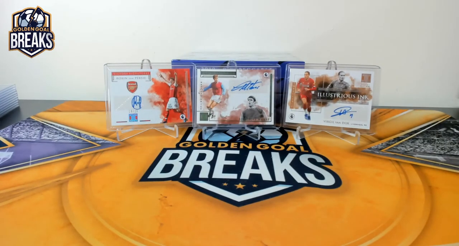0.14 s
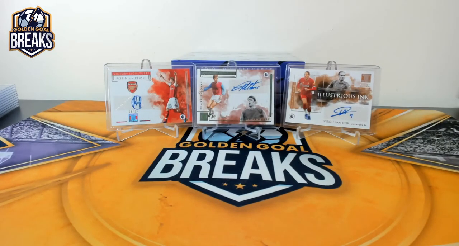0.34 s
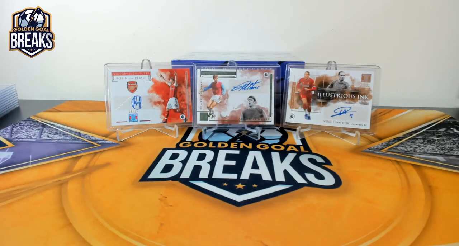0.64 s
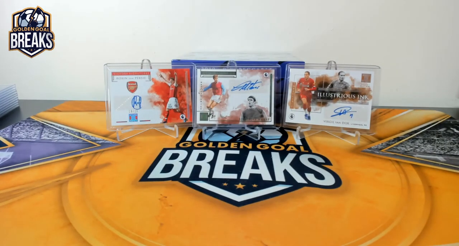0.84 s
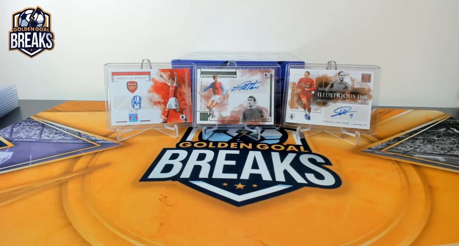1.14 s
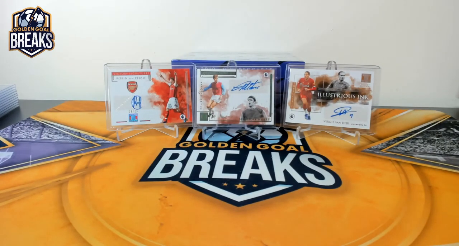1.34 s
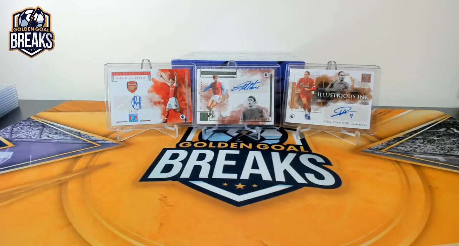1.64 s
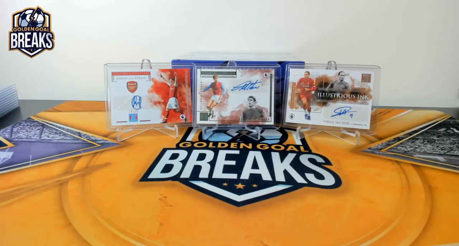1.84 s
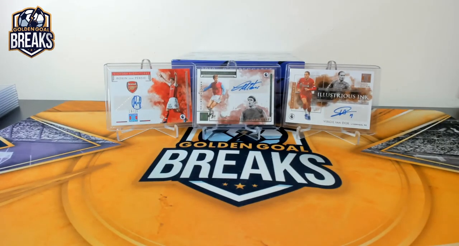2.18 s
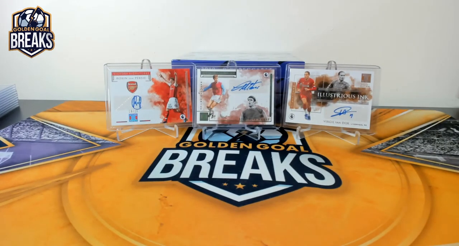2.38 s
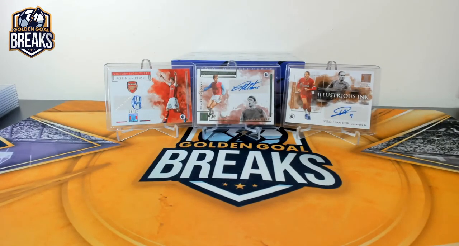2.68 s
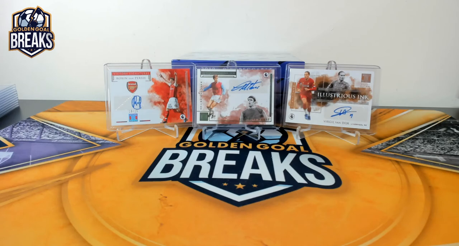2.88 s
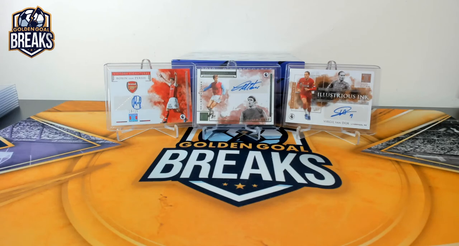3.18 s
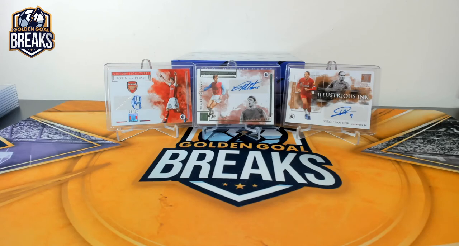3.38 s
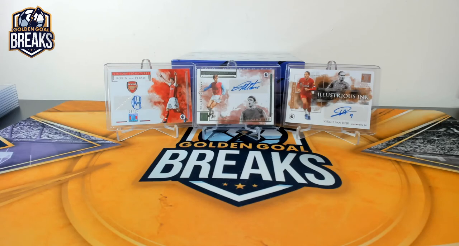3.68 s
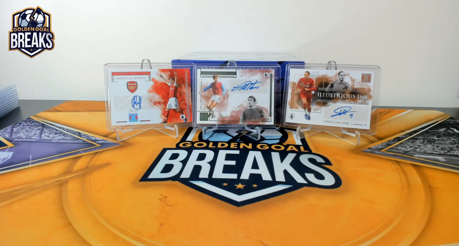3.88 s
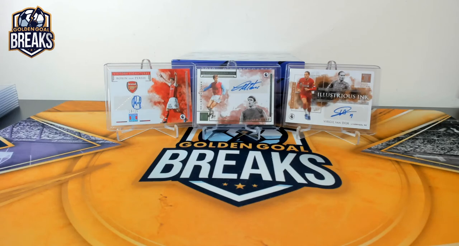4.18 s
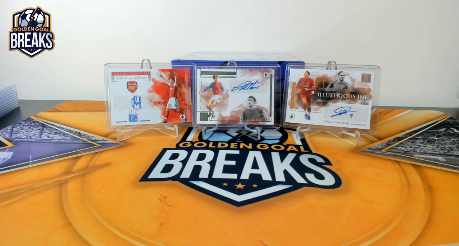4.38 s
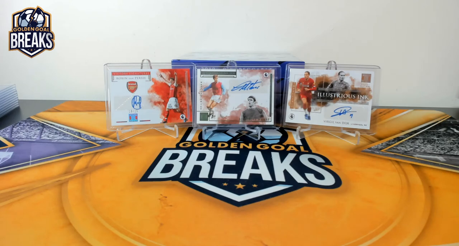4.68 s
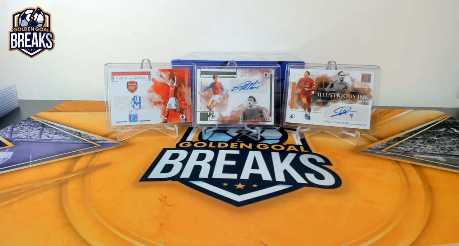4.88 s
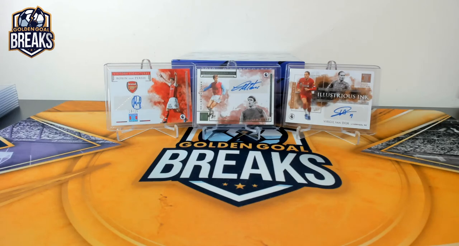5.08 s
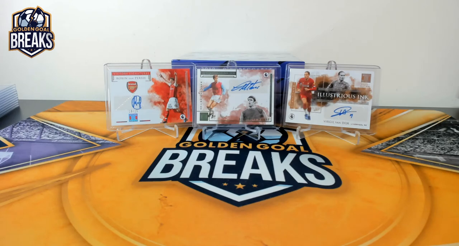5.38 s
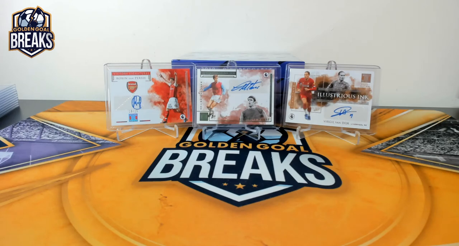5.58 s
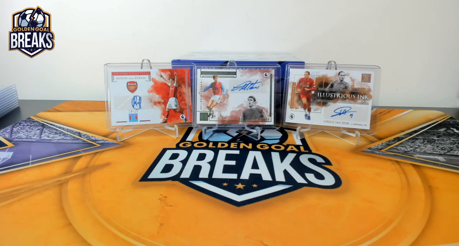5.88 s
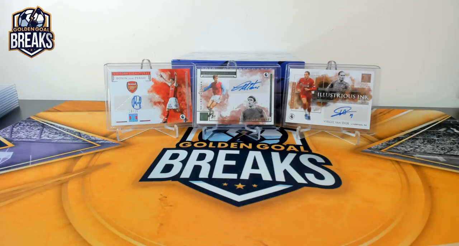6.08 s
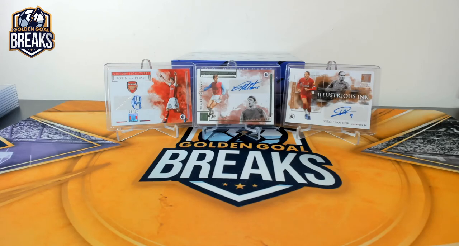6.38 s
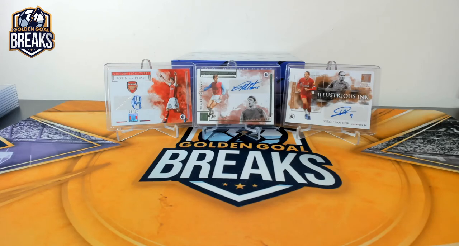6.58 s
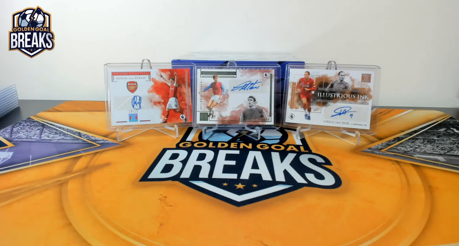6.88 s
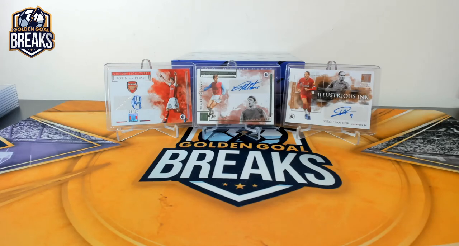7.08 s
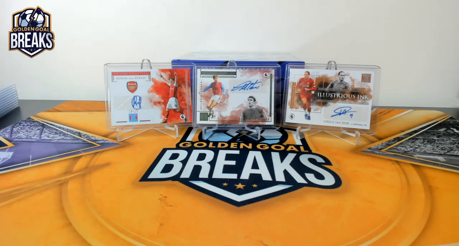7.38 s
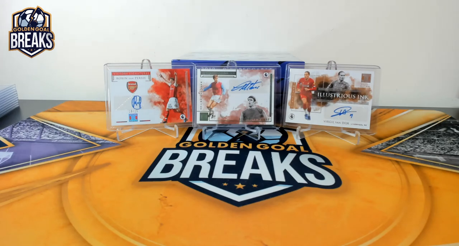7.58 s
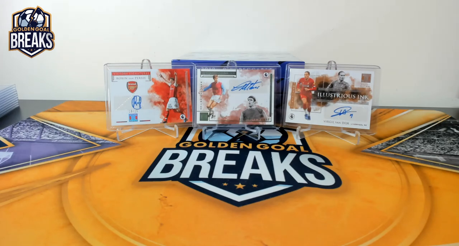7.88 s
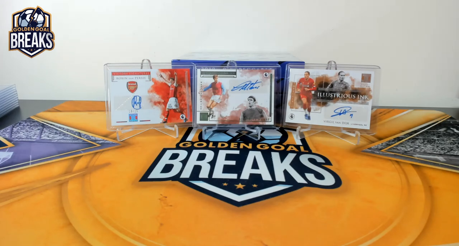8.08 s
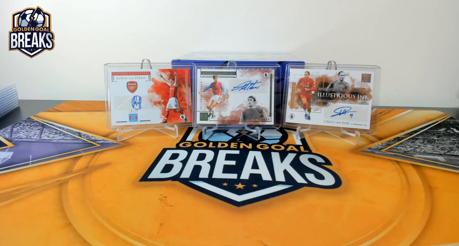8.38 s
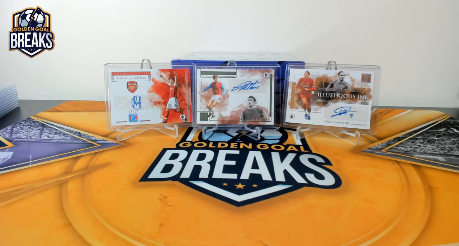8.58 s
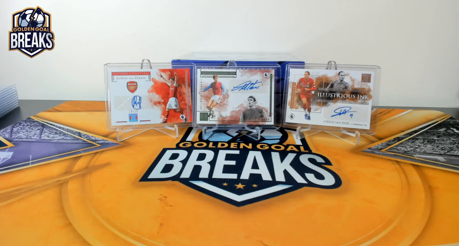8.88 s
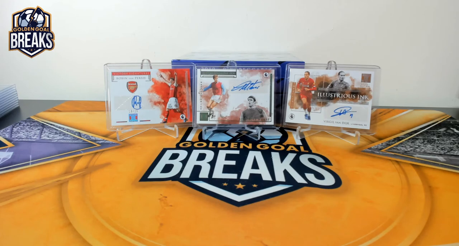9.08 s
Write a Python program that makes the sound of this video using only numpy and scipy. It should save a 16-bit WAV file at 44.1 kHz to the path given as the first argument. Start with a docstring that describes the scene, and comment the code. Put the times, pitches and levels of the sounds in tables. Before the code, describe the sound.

Dry, bright plastic crackling from sleeves flexed by hand, heard near the microphone with short lively room reflections. An early flurry swells into one strong burst, then single snaps and small groups follow with uneven pauses. Soft grainy knocks of cards against a tabletop accompany some of them. The last second is almost only quiet air and weak hum.

```python
"""Creases in thin plastic card sleeves buckle in sharp snaps, close by, in a small, bare room.
Each snap is a short wavelet that rings the film for a moment. In short strokes film slides on film:
many tiny catches make a fine crackle, and small creases give way at random.
Now and then a stack of cards bumps the table: grainy noise through the resonances of stack and table top.
Air noise and a faint, wavering hum lie under it all."""
import sys
import numpy as np
from scipy import signal
from scipy.fft import rfft, irfft
from scipy.io import wavfile
from scipy.ndimage import uniform_filter1d

SR = 44100
rng = np.random.default_rng(int(sys.argv[2]) if len(sys.argv) > 2 else 0)


def dump(signal):
    """Clip the signal to [-1, 1] and save it as 16-bit WAV at the path in sys.argv[1]."""
    limited = np.clip(np.atleast_2d(signal).T, -1, 1)
    pcm = np.round(limited * 32767).astype(np.int16)
    wavfile.write(sys.argv[1], SR, pcm)


N = 407484

# how strongly the film radiates: (frequency [Hz], gain [dB])
FILM_RESPONSE = [(100, -27), (300, -14), (700, -1), (1000, -2), (1400, 2), (1900, -2), (2400, -4),
                 (3000, -3), (4500, -4.5), (6500, -1), (9000, 2.5), (12000, 0), (16000, -9.5)]
# film sliding on film: (start [s], length [s], level before it sags [dB], pitch of the crackle [Hz])
SLIDING_STROKES = [(0.0, 0.025, -49, 6100), (0.05, 0.045, -49.5, 4100), (0.288, 0.115, -56.5, 3600),
                   (0.55, 0.05, -53.5, 2980), (0.62, 0.1, -61, 3500), (0.82, 0.17, -56.5, 3630),
                   (1.085, 0.13, -56.5, 1700), (1.315, 0.09, -51.5, 3920), (1.418, 0.085, -30, 5000),
                   (1.505, 0.045, -37, 3960), (1.59, 0.04, -34.5, 3350), (1.635, 0.15, -47.5, 4340),
                   (2.06, 0.07, -52.5, 4200), (2.785, 0.09, -64.5, 3020), (2.905, 0.07, -60, 3300),
                   (3.04, 0.05, -63, 5000), (4.183, 0.115, -54.5, 4300), (4.3, 0.03, -48, 4330),
                   (4.69, 0.14, -68, 3960), (4.855, 0.055, -62, 5000), (5.002, 0.03, -63, 6400),
                   (5.034, 0.062, -50, 4830), (5.84, 0.03, -78, 4200), (5.975, 0.018, -71, 3490),
                   (6.23, 0.04, -69, 3520), (6.395, 0.05, -54.5, 3680), (6.488, 0.085, -52.5, 3830),
                   (6.65, 0.12, -59.5, 4250), (6.82, 0.035, -59.5, 5250), (6.96, 0.09, -67.5, 4450),
                   (7.125, 0.11, -59.5, 6000), (7.318, 0.04, -58, 4400), (7.39, 0.08, -69, 4200),
                   (7.65, 0.028, -65.5, 4600), (7.818, 0.07, -48, 2730), (7.905, 0.04, -42, 3040),
                   (8.32, 0.025, -73.5, 7990), (8.445, 0.055, -74.5, 8440), (8.595, 0.035, -78.5, 7000),
                   (8.775, 0.03, -71, 6770), (9.02, 0.04, -76, 8500)]


def undb(db):
    """Turn decibels into a gain."""
    return 10 ** (np.asarray(db) / 20)


def unit(x):
    """Scale to an rms of 1."""
    return x / np.sqrt(np.mean(x ** 2))


def fade(t, t60):
    """Exponential decay, 60 dB down after t60 seconds."""
    return np.exp(-np.log(1000) * t / t60)


def add(out, at, x):
    """Mix x into out from a time in seconds."""
    start = max(int(round(at * SR)), 0)
    out[start:start + len(x)] += x[:max(N - start, 0)]


def colour(x, points, size=4096):
    """Filter x to follow (Hz, dB) points without sounding ahead of time, by way of the cepstrum."""
    hz, db = np.transpose(points)
    freqs = np.maximum(np.fft.rfftfreq(size, 1 / SR), 1)
    response_db = np.interp(np.log(freqs), np.log(hz), db)
    cepstrum = irfft(np.log(undb(response_db)))
    # folding the second half onto the first makes the filter causal
    cepstrum[1:size // 2] *= 2
    cepstrum[size // 2 + 1:] = 0
    impulse_response = irfft(np.exp(rfft(cepstrum)))
    return signal.fftconvolve(x, impulse_response)[:len(x)]


def resonate(x, hz, q):
    """Two-pole resonance with gain 1 at its centre; a higher q is sharper."""
    w = 2 * np.pi * min(hz, .45 * SR) / SR
    a = np.sin(w) / (2 * q)
    return signal.lfilter([a, 0, -a], [1 + a, -2 * np.cos(w), 1 - a], x)


def walk(rate):
    """Random control curve: each level lasts about 1 / rate seconds and slides to the next; spread near 1."""
    hold = max(int(SR / rate), 1)
    steps = np.repeat(rng.standard_normal(N // hold + 1), hold)
    return unit(uniform_filter1d(steps, hold)[:N])


def background(waver_db=1.5, drift=1.0, swell_db=1.44):
    """Dull air noise that swells gently, and hum lines wavering in level and phase (drift in radians)."""
    # colour of the air noise: (frequency [Hz], relative level per Hz [dB])
    air_colour = [(25, -4.5), (50, 0.5), (85, -2.5), (170, -3), (350, -0.5), (650, -5.5), (1300, -7.5),
                  (2200, -13), (3500, -17), (6000, -24.5), (10000, -38), (14000, -37.5)]
    # hum of an appliance: (frequency [Hz], rms level before the waver [dB])
    hum_lines = [(64.6, -83.5), (101, -79.5), (107.7, -83.5), (231.5, -84), (457.6, -83)]
    air_db = -68.5
    t = np.arange(N) / SR
    air = unit(colour(rng.standard_normal(N), air_colour)) * undb(air_db + swell_db * walk(3))
    hum = 0
    for hz, db in hum_lines:
        level = np.sqrt(2) * undb(db + waver_db * walk(15))
        hum = hum + level * np.sin(2 * np.pi * hz * t + drift * walk(3.9))
    return air + hum


def room(x, wet_db=-3, build=0.022, t60_low=0.29, t60_mid=0.43, t60_top=0.38, lumpy=0.57, blend=0.057,
         size=26000):
    """Room echo: uneven reflections build up and thicken into a smooth tail; three bands die at their own rates."""
    # colour of the echo from the walls: (frequency [Hz], gain [dB])
    wall_colour = [(150, -5), (500, 2), (1500, 1), (3000, -2), (6000, -1.5), (10000, 2), (15000, 5)]
    t = np.arange(size) / SR
    noise = rng.standard_normal(size)
    # the unevenness fades with time constant blend [s]
    echoes = noise * np.exp(lumpy * np.exp(-t / blend) * (rng.standard_normal(size) - lumpy))
    low = signal.sosfiltfilt(signal.butter(2, 1500, fs=SR, output="sos"), echoes)
    top = signal.sosfiltfilt(signal.butter(3, 9000, "high", fs=SR, output="sos"), echoes)
    mid = echoes - low - top
    tail = low * fade(t, t60_low) + mid * fade(t, t60_mid) + top * fade(t, t60_top)
    tail = colour(tail * np.minimum(t / build, 1) ** 2, wall_colour)
    return undb(wet_db) * signal.fftconvolve(x, unit(tail) / np.sqrt(size))[:N]


def bumps(q=.9, broad_db=-4, grain=0.39, size=16384):
    """Cards scuff and knock in uneven grains, which excite the resonances of the stack and table top."""
    # cards on the table and on each other: (time [s], peak level [dB], centre [Hz], t60 [s])
    contacts = [(0.063, -47, 1230, 0.16), (0.391, -55.5, 1720, 0.36), (0.641, -41.5, 920, 0.036),
                (0.759, -50, 850, 0.03), (0.824, -42, 1120, 0.024), (0.943, -39.5, 497, 0.15),
                (0.966, -44.5, 600, 0.26), (1.122, -49.5, 603, 0.34), (1.324, -38, 820, 0.029),
                (1.425, -42, 490, 0.29), (1.511, -39, 395, 0.14), (1.596, -41.5, 430, 0.2),
                (1.605, -45, 210, 0.14), (1.779, -51, 418, 0.12), (2.106, -54, 896, 0.062),
                (2.13, -54.5, 1680, 0.32), (2.523, -54, 1460, 0.049), (2.596, -54.5, 1700, 0.072),
                (2.933, -49, 689, 0.046), (3.031, -50.5, 1080, 0.038), (3.521, -57, 2030, 0.087),
                (3.922, -42.5, 1050, 0.046), (4.203, -51, 1350, 0.27), (4.323, -46, 910, 0.04),
                (5.223, -49.5, 780, 0.043), (5.267, -45, 747, 0.031), (5.584, -55, 1277, 0.066),
                (6.219, -59, 847, 0.13), (6.413, -56.5, 850, 0.11), (6.495, -46.5, 1400, 0.2),
                (6.761, -49.5, 1990, 0.11), (7.17, -60, 1410, 0.29), (7.399, -54, 766, 0.06),
                (7.817, -49, 700, 0.36), (7.915, -38.5, 326, 0.13), (7.919, -36.5, 750, 0.038)]
    # resonances of the card stack and table top: (frequency [Hz], width [Hz], gain [dB])
    table_modes = [(150, 50, -15), (234.8, 17, -8), (298, 34, -5), (455, 83, 4.5), (520, 40, -10),
                   (830, 140, 2), (1130, 93, -1), (1536, 84, 0.5), (1900, 320, 7.5)]
    rise_share = 0.058  # a soft contact builds and dies slowly: its rise as a share of its t60
    out, t = np.zeros(N), np.arange(size) / SR
    chance = rng.standard_normal((len(contacts), 2, size))
    for (at, db, hz, t60), (scuff, catch) in zip(contacts, chance):
        grains = np.tanh(unit(uniform_filter1d(catch, size=160)))
        scuff = scuff * np.exp(grain * grains)
        modes = sum(undb(gain) * resonate(scuff, f, f / width) for f, width, gain in table_modes)
        body = undb(broad_db) * scuff + modes
        # a softer contact reaches only the lower resonances
        knock = unit(resonate(resonate(body, hz, q), hz, q))
        rise = rise_share * t60
        contact = np.minimum(t / rise, 1) * fade(np.maximum(t - rise, 0), t60)
        add(out, at, undb(db) * contact * knock)
    return out


def sliding():
    """Gain and pitch of the sliding film: each stroke takes hold, sags and stops; the firmest sets the pitch."""
    attack_s, sag_db_per_s, release_t60_s = 0.014, 18, 0.049
    t = np.arange(N) / SR
    gain, pitch = np.zeros(N), np.full(N, float(SLIDING_STROKES[0][3]))
    for start, length, db, hz in SLIDING_STROKES:
        since = np.maximum(t - start, 0)
        stroke = np.minimum(since / attack_s, 1) * undb(db - sag_db_per_s * since)
        stroke = stroke * fade(np.clip(since - length, 0, 1), release_t60_s)
        pitch = np.where(stroke > gain, hz, pitch)
        gain = np.maximum(gain, stroke)
    return gain, pitch


def slide(per_second=2200, scatter_db=2.5, hiss=.45, catch_db=3, band_db=3.0):
    """Tiny catches of film on film, of very unequal size; slack film sounds low, taut film high."""
    effort, hz = sliding()
    largest, q = 3.6, .7
    sizes = undb(scatter_db * np.minimum(rng.exponential(size=N), largest)) * rng.choice([-1, 1], N)
    catches = unit(sizes * (rng.random(N) < per_second / SR)) + hiss * rng.standard_normal(N)
    catches = colour(catches, FILM_RESPONSE)
    # the pitch of the crackle moves over facets of different size
    facets_hz = np.geomspace(1400, 10000, 8)
    place = np.interp(np.log(hz), np.log(facets_hz), np.arange(len(facets_hz)))
    crackle = 0
    for k, f in enumerate(facets_hz):
        share = np.maximum(1 - abs(place - k), 0) * undb(band_db * walk(60))
        crackle = crackle + share * unit(resonate(resonate(catches, f, q), f, q))
    # flat film brushing past adds a broad, soft rustle at any pitch
    rustle = undb(-13.5) * unit(catches)
    return (crackle + rustle) * effort * undb(catch_db * walk(110))


def small_creases(above_db=8, scatter_db=2.5, pitch_ratio=0.98, pitch_spread=0.29, film_db=-10, count=96):
    """Small creases give way at random while film slides, stronger in a firmer stroke; rows as in snaps()."""
    start, length, db, hz = np.transpose(SLIDING_STROKES)
    # spread the creases over the strokes laid end to end
    ends = np.cumsum(length)
    travel = (np.arange(count) + rng.random(count)) / count * ends[-1]
    k = np.searchsorted(ends, travel)
    strength, facet = rng.standard_normal((count, 2)).T
    times = start[k] + ends[k] - travel
    levels = db[k] + above_db + scatter_db * strength
    pitches = hz[k] * pitch_ratio * np.exp(pitch_spread * facet)
    return list(zip(times, levels, pitches, np.full(count, film_db)))


def snaps(bounce_db=-10, bounce_s=0.00046, ring_t60=0.025, tock_hz=1700, tock_q=8, tock_db=-16,
          tock_scatter_db=3, facing=0.72, stray_db=2.5, size=2048, count=9):
    """Each crease flips in a short wavelet and rings the film; returns the near sound and that sent to the walls."""
    # the loudest creases that buckle:
    # (time [s], level over 1 ms [dB], pitch of the facet [Hz], ring of the film relative to the snap [dB])
    loud_creases = [(0.009, -43, 4800, 6.5), (0.0556, -34.5, 4900, 3), (0.2995, -45, 5100, 7),
                    (0.5, -41.5, 7400, -1.5), (0.5664, -52, 2940, -8), (0.6325, -41, 5600, 3.5),
                    (0.6455, -40.5, 4300, -7), (0.6534, -34.5, 4800, -15), (0.7582, -40, 5100, 3),
                    (0.7997, -35, 4700, -11), (0.8308, -30, 4800, -4), (0.8433, -33, 7060, -9),
                    (0.891, -35.5, 4300, -10), (0.9125, -34.5, 5900, -1.5), (0.9283, -36, 4080, -10),
                    (0.932, -34.5, 5170, -3), (0.9364, -34, 7400, -3.5), (0.9781, -33, 5230, -5.5),
                    (1.028, -44.5, 4650, -2), (1.072, -43.5, 5750, 2), (1.1649, -37, 4250, -1.5),
                    (1.289, -48, 4500, 2.5), (1.318, -46, 4560, -10), (1.325, -32.5, 4940, -4),
                    (1.3451, -37, 6070, -12), (1.3705, -36, 5240, -9.5), (1.3913, -36.5, 3160, 1),
                    (1.4063, -23, 5060, -0.5), (1.4227, -18.5, 4640, -1), (1.4303, -19, 4130, -10),
                    (1.4356, -18.5, 4230, -21), (1.4433, -22, 5070, -11), (1.4508, -18, 5770, -9.5),
                    (1.4565, -23, 5454, -6.5), (1.4593, -16, 4790, -14.5), (1.4676, -16.5, 4700, -9),
                    (1.472, -17, 5360, -9), (1.4745, -16, 5400, -3.5), (1.4785, -15.5, 5160, -17),
                    (1.4839, -18.5, 4700, -2.5), (1.492, -21, 4260, -10.5), (1.5088, -21, 4635, -3),
                    (1.5173, -20, 3650, -3.5), (1.5326, -19, 3200, -6.5), (1.5494, -20, 5040, -1),
                    (1.5666, -16, 3000, -5), (1.59, -24, 5930, -2), (1.603, -13, 4500, -8),
                    (1.632, -28, 4500, -4.5), (1.723, -26, 4900, -4), (1.7794, -18.5, 5400, -5),
                    (1.7912, -22, 4850, -0.5), (2.0635, -41, 3100, -3), (2.0744, -33.5, 6040, -9),
                    (2.106, -33.5, 4900, 0), (2.1332, -33.5, 4340, -3.5), (2.253, -44.5, 4870, -6),
                    (2.3455, -31, 4270, -6.5), (2.3547, -33, 6530, -5), (2.5227, -36.5, 5370, 0),
                    (2.7828, -48, 6230, -8.5), (2.8146, -50.5, 2800, -1), (2.8961, -44.5, 6200, -11),
                    (2.9311, -37, 5700, -5), (3.0305, -43.5, 3380, -2.5), (3.055, -45.5, 5930, -1),
                    (3.2176, -36, 6200, -2.5), (3.2546, -41.5, 4300, -1), (3.3842, -28, 6160, -2.5),
                    (3.5209, -41.5, 5940, -9), (3.687, -47, 5100, -0.5), (3.6966, -38, 6770, -9.5),
                    (3.772, -43.5, 6080, -4.5), (3.8094, -37.5, 4630, -2), (3.8283, -38, 5650, -9),
                    (3.8682, -30, 4730, -3.5), (3.9016, -41, 3700, 0), (3.9203, -36.5, 3620, -2),
                    (3.9249, -32, 4440, 1), (3.947, -28.5, 7900, -6), (3.9588, -27.5, 7340, -8),
                    (3.9647, -32.5, 4160, -4.5), (4.035, -39, 5900, -6), (4.038, -35, 5040, -3),
                    (4.1914, -37, 3540, -1), (4.2073, -27, 5800, -6), (4.3169, -33, 5040, 1.5),
                    (4.3287, -31.5, 6040, -16), (4.3552, -36.5, 3670, -17), (4.3784, -21.5, 5740, -20),
                    (4.5514, -39.5, 4680, -0.5), (4.58, -41, 3100, -3.5), (4.5898, -40.5, 3800, -6),
                    (4.7639, -43.5, 3780, -6), (4.8123, -45.5, 4060, -5), (4.8394, -48.5, 4600, 4),
                    (5.071, -37, 5030, -6), (5.2239, -43.5, 2660, -6), (5.2673, -35.5, 2300, -6),
                    (5.2806, -32.5, 3800, -4.5), (5.2895, -31, 6600, -10), (5.361, -45.5, 4800, -18),
                    (5.5483, -28.5, 6640, -14.5), (5.563, -41, 3807, -4), (6.253, -46.5, 3110, 2),
                    (6.3504, -35, 4700, -5.5), (6.4625, -36, 4800, 1.5), (6.5044, -21, 4070, -9.5),
                    (6.5488, -32, 7300, -6.5), (6.5613, -37.5, 3600, 1), (6.6342, -30.5, 5800, -9.5),
                    (6.673, -44.5, 5260, -6), (6.7181, -32, 4800, -3.5), (6.7394, -43.5, 5100, 3),
                    (6.8823, -42.5, 3800, -0.5), (7.0218, -44, 4370, 3.5), (7.0735, -39.5, 5640, -5.5),
                    (7.1784, -33.5, 7500, -16.5), (7.4302, -46, 3850, -2.5), (7.5, -49, 3900, -4.5),
                    (7.8524, -32, 7900, -2), (7.8662, -33.5, 6200, 1.5), (7.9332, -29.5, 4670, -3.5),
                    (8.775, -54.5, 5600, 2)]
    # decay of the wavelet [cycles], level of its broad crack [dB], sharpness of the film's modes
    flip_cycles, crack_db, mode_q = .6, -12, 10
    near, stray, t = np.zeros(N), np.zeros(N), np.arange(size) / SR
    lead = 32 / SR  # room ahead of the flip for the wavelet to build
    creases = loud_creases + small_creases()
    chance = rng.standard_normal((len(creases), size + count))
    for (at, db, hz, film_db), draw in zip(creases, chance):
        phase, path, slack, grip, *detune = draw[size:]

        def wavelet(u):
            """The facet gathers speed, flips and brakes."""
            return np.exp(-abs(u) * hz / flip_cycles) * np.cos(2 * np.pi * (hz * u + phase))

        # the table returns the flip, and the facet's edge adds a broad crack
        bounce = undb(bounce_db) * wavelet(t - lead - bounce_s * np.exp(path / 2))
        crack = unit(resonate(signal.unit_impulse(size, round(lead * SR)), hz, 1 / 2))
        flip = unit(wavelet(t - lead) + bounce) + undb(crack_db) * crack
        # a large, slow facet has no sharp top
        flip = signal.lfilter(*signal.butter(2, min(3 * hz, .45 * SR), fs=SR), flip)
        # bending waves scatter through the film and need a moment to come back from its edges
        waves = draw[:size] * fade(t, ring_t60) * np.clip(t / 0.0013, 0, 1) ** 2
        modes = sum(resonate(waves, hz * np.exp(d), mode_q) for d in detune)
        ring = signal.fftconvolve(waves + modes, flip)[:size]
        # the whole sleeve answers with a hollow tock that depends on how it is held
        tock = unit(resonate(waves, tock_hz * np.exp(.3 * slack), tock_q))
        tock = tock * undb(tock_db + tock_scatter_db * grip)
        pulse, ring_gain = unit(colour(flip, FILM_RESPONSE)), undb(film_db)
        # packs the pulse's energy into 1 ms at the listed level
        gain = undb(db) * np.sqrt(SR / 1000 / size)
        add(near, at - lead, gain * (pulse + ring_gain * unit(colour(ring, FILM_RESPONSE)) + tock))
        # over all directions the peaks of the ring average out: the walls get its energy, smoothly spread
        spread = pulse * np.hypot(1, ring_gain) + tock
        # a facet that faces the listener sounds dry: little ring and little room
        add(stray, at - lead, gain * spread * undb(stray_db + facing * film_db))
    return near, stray


def scene():
    """Sleeves and cards sound in the room, over its background."""
    near, stray = snaps()
    handling = slide() + bumps()
    return (near + handling + room(stray + handling) + background())[None]


def record(dry):
    """The level dips briefly twice, by up to 20 dB; filters cut the rumble and the top."""
    # brief dips of the level: (start [s], end [s])
    dip_spans = [(4.37, 4.3755), (8.345, 8.364)]
    rumble_hz, top_hz = 32, 16000
    t = np.arange(N) / SR
    dipped = uniform_filter1d(sum(1. * ((t > a) & (t < b)) for a, b in dip_spans), size=40)
    rumble_cut = signal.butter(2, rumble_hz, "high", fs=SR, output="sos")
    sound = signal.sosfilt(rumble_cut, dry * undb(-20 * dipped))
    return signal.sosfilt(signal.ellip(8, .2, 70, top_hz, fs=SR, output="sos"), sound)


dry = scene()
out = record(dry)
dump(out)
```